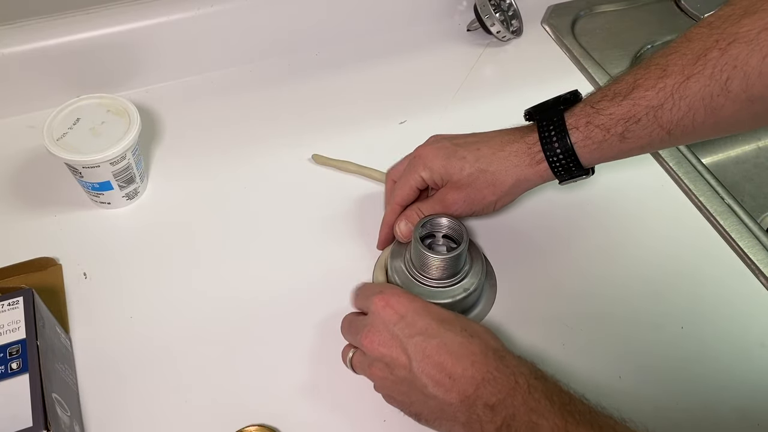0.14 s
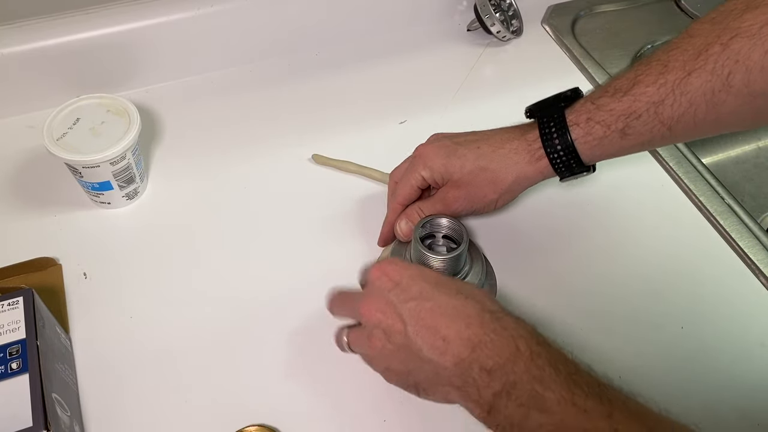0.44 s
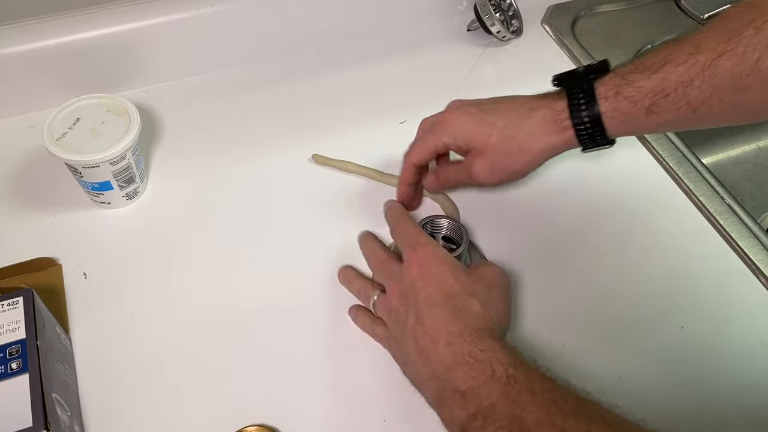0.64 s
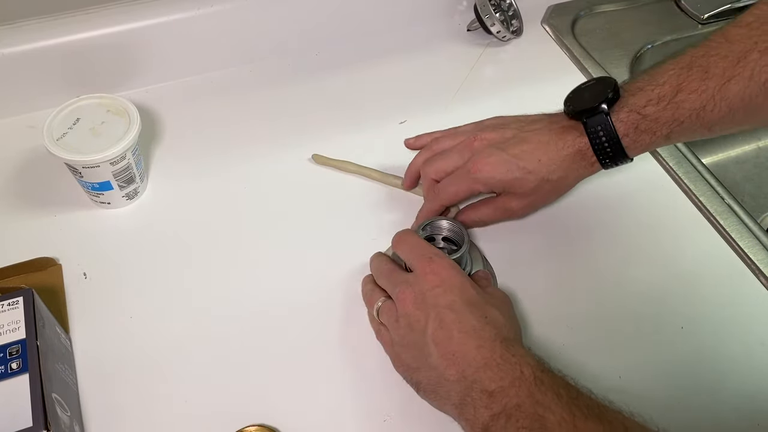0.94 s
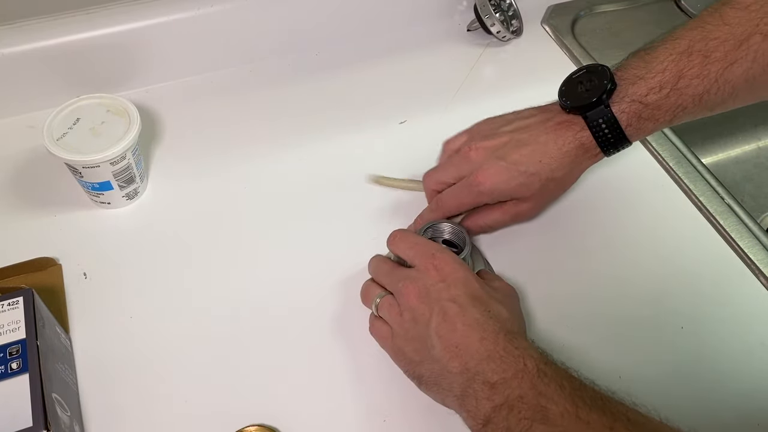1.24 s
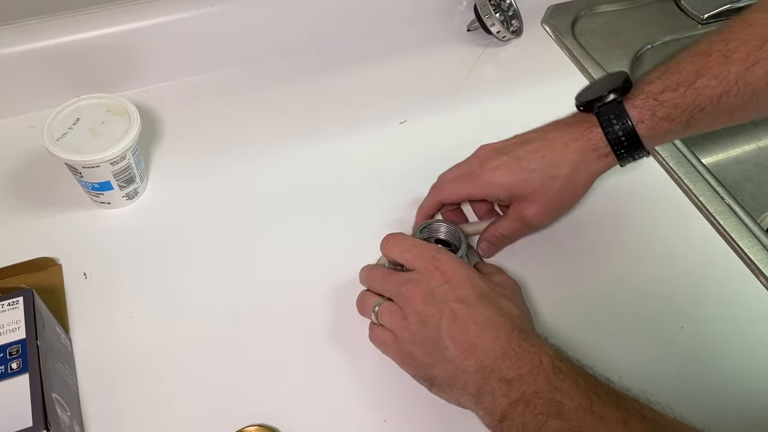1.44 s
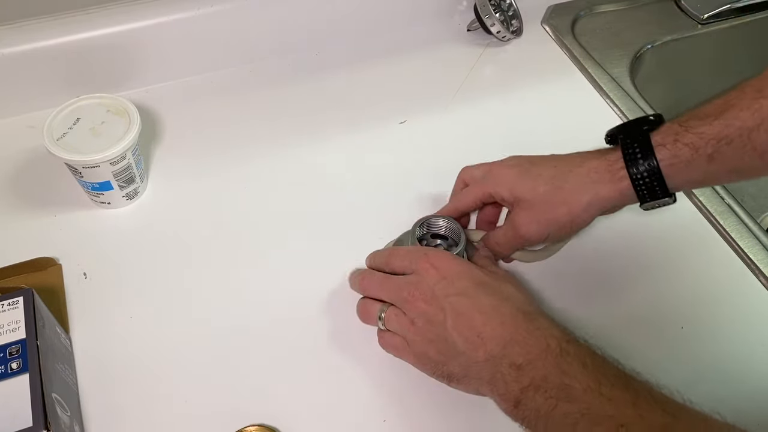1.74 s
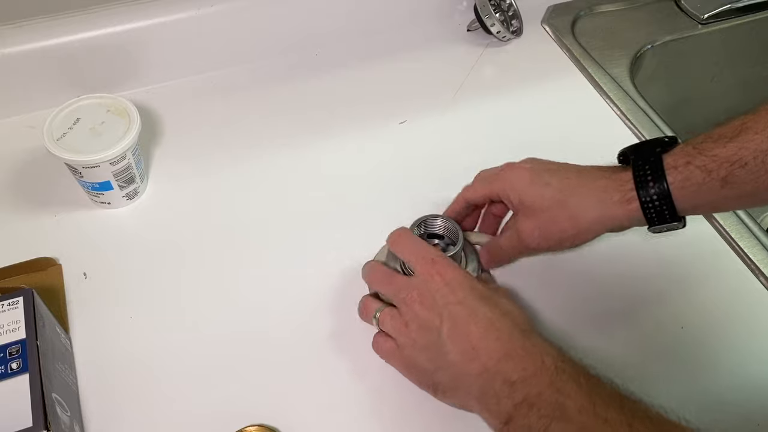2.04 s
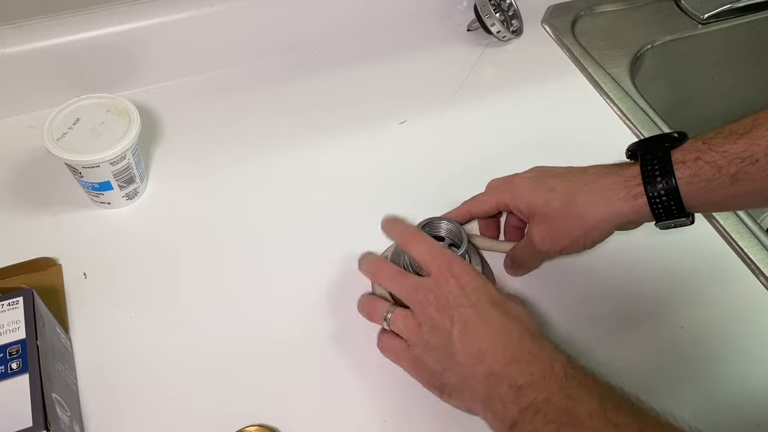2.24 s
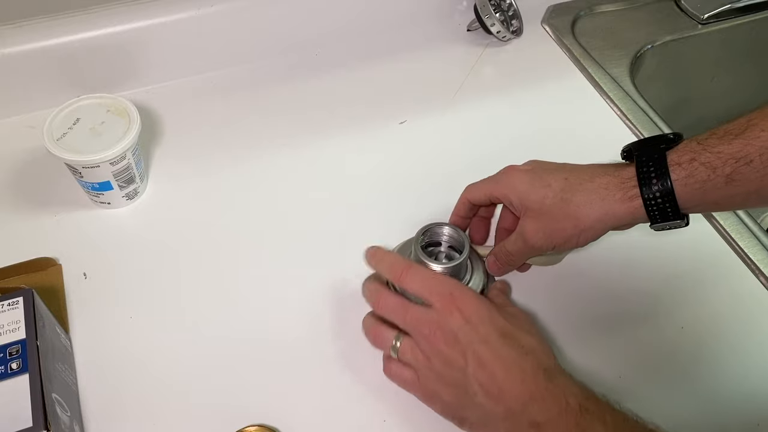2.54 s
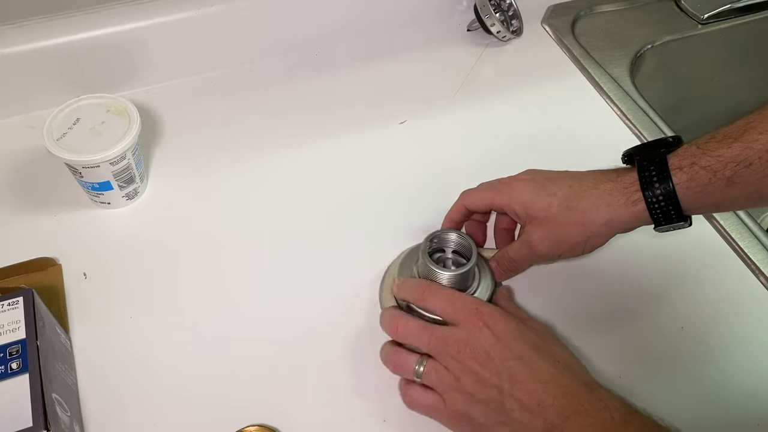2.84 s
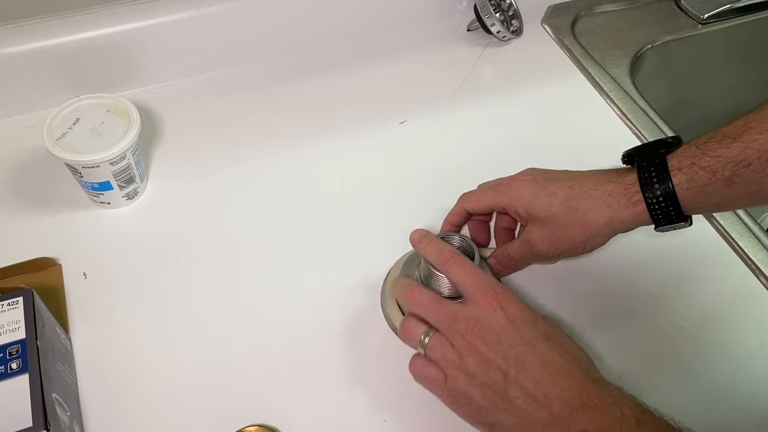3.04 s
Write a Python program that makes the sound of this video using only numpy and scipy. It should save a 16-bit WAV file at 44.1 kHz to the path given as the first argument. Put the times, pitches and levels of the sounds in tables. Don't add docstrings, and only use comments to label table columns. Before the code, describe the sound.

A small metal fitting is turned and shifted on a hollow countertop, clinking, scraping and knocking softly.

```python
import sys
import numpy as np
from scipy import signal
from scipy.fft import rfft, irfft
from scipy.io import wavfile
from scipy.ndimage import uniform_filter1d

SR = 44100
rng = np.random.default_rng(int(sys.argv[2]) if len(sys.argv) > 2 else 0)


def gain_from_decibels(decibels):
    exponent = np.asarray(decibels, float) / 20
    return 10 ** exponent


def generate_wav(sig):
    pcm = np.round(np.clip(np.atleast_2d(sig).T, -1, 1) * 32767).astype(np.int16)
    wavfile.write(sys.argv[1], SR, pcm)


N = 141120
T = np.arange(N) / SR

# [middle t/s, width/s, level/dB, dullness/dB]
FINGER_RUBS = [(0.058, 0.041, -60, 8.5), (.48, 0.017, -69, 24.5), (.53, 0.023, -64, 9),
               (0.836, 0.039, -57.5, 10), (.92, 0.02, -61.5, 14), (.98, 0.02, -58.5, 9),
               (1.09, 0.046, -65, 12), (1.27, 0.11, -63.5, 9.5), (1.43, 0.075, -61.5, 18),
               (1.49, 0.043, -51, 3), (1.548, 0.056, -53, 14), (1.69, 0.064, -59, 10.5),
               (1.84, 0.06, -70, 11), (2., 0.027, -61.5, 15.5), (2.088, 0.051, -51.5, -18),
               (2.193, 0.035, -49.5, -7), (2.32, 0.083, -68, 12), (2.421, 0.026, -54, 9),
               (2.479, 0.058, -52, 10), (2.609, 0.042, -55, 0), (2.68, 0.0071, -55, -4),
               (2.75, 0.044, -60.5, -8.5), (2.903, 0.079, -52, -8), (3.028, 0.021, -52, 9.5),
               (3.19, 0.036, -55, 7)]
# [f/Hz, level/dB]
SKIN_TONE = [
    (1500, -17),
    (2500, -8.5),
    (4300, -8),
    (8200, 0.5),
    (9500, -2.5),
    (10600, -6),
    (13000, -8.5),
    (15500, -14),
]
# [f/Hz, time to fall 60 dB/s, level/dB]
STEEL_MODES = [(2410, .15, -9), (3060, .15, -7), (3870, .1, -5), (4230, .15, -6), (4520, .2, -1.5),
               (5350, .06, -7), (6470, .05, -7), (7650, .07, -2), (8560, .04, -5), (9440, .06, -7),
               (11400, .07, -9)]
# [middle t/s, width/s, level/dB, grit/dB, weight on deep modes/dB]
BASE_DRAGS = [(0.048, 0.046, -54, 6, 0.5), (.34, 0.036, -51, 1, 2.5), (.48, 0.034, -49.5, 4, -1.5),
              (.55, 0.02, -44, -9, 2.5), (0.862, 0.033, -46.5, -17, 2), (0.948, 0.065, -52, 7, 0.5),
              (1.138, 0.031, -55, -3, 5), (1.28, 0.074, -56, -5, -3), (1.371, 0.064, -53.5, 9.5, 5),
              (1.49, 0.071, -46, -1.5, 1), (1.658, 0.072, -49.5, -0.5, -5),
              (1.998, 0.037, -44.5, -5.5, 0.5), (2.071, 0.027, -46, -4, -1.5), (2.17, 0.066, -50.5, 6, 0.5),
              (2.419, 0.059, -50, 6, -0.5), (2.511, 0.027, -46, -3, -1.5), (2.61, 0.038, -55.5, 8, 3),
              (2.69, 0.054, -47.5, -1, 1), (2.77, 0.014, -56, 5, 1), (2.872, 0.079, -51.5, 6, -2),
              (2.998, 0.034, -46.5, 5.5, -0.5), (3.132, 0.043, -47, 0, 2)]
# [f/Hz, width/Hz, level/dB]
COUNTER_MODES = [
    (185, 47, -2),
    (317.4, 34, -0.5),
    (349.8, 76, 2),
    (421.6, 38, 1.5),
    (521, 26, -1.5),
    (592.2, 34, 0),
    (679, 38, -13.5),
    (718, 32, -12),
]
# [t/s, peak level/dB, favoured f/Hz]
BASE_SLIPS = [(0.324, -40.5, 423), (0.449, -41, 324), (0.482, -38.5, 343), (0.513, -35, 344),
              (0.849, -33.5, 560), (0.903, -32.5, 581), (1.065, -43.5, 328), (1.097, -49, 377),
              (1.13, -42.5, 573), (1.215, -42, 293), (1.28, -51, 288), (1.301, -56, 420), (1.347, -36, 610),
              (1.381, -36, 394), (1.467, -30, 327.5), (1.486, -34, 319), (1.642, -34.5, 364),
              (1.746, -58, 590), (1.959, -45, 410), (1.993, -43, 338), (2.057, -36, 572), (2.127, -44, 585),
              (2.368, -41, 423), (2.504, -39, 599), (2.606, -36.5, 309), (2.653, -55, 465),
              (2.674, -45, 350), (2.733, -39, 590), (2.83, -39, 306), (2.864, -38, 319), (2.92, -41, 327),
              (2.974, -43, 370), (2.994, -37.5, 350), (3.115, -38.5, 586),
              (.01, -48, 266), (.05, -42, 611), (.52, -42, 200), (1.205, -44, 197),
                     (1.235, -41, 194), (1.29, -48, 842), (1.345, -40, 192), (1.39, -45.5, 847),
                     (1.465, -39.5, 732), (1.52, -42, 345), (1.94, -43, 195)]
# [t/s, level/dB, colour
# f/Hz]
STEEL_TICKS = [(.011, -33, 5500), (0.447, -37.5, 3000), (.5142, -49, 8000), (0.6286, -37.5, 4500),
               (1.2645, -35, 1800), (1.4117, -34.5, 7440), (1.5206, -23.5, 3230), (1.9907, -37, 5940),
               (2.1794, -39, 6450), (2.3995, -27, 2600), (2.67, -41, 5030), (2.7314, -36.5, 7800),
               (2.9492, -33, 6900), (3.005, -23, 7650), (0.908, -26, 1100)]
# [t/s, f/Hz, level/dB]
STEEL_RINGS = [(.011, 5430, -62), (.011, 6250, -63), (.022, 6500, -71), (.011, 7150, -65),
               (.011, 3450, -64), (0.009, 2540, -65.5), (.011, 3930, -66), (0.057, 8140, -62),
               (0.051, 1810, -63), (.075, 3370, -64.5), (.514, 4520, -64), (.514, 9500, -70),
               (.826, 5130, -62), (1.211, 4520, -70), (1.32, 1800, -64), (1.398, 1795, -54),
               (1.411, 4520, -57), (1.52, 3050, -51.5), (1.52, 3900, -57), (1.521, 5260, -57),
               (2.2, 4600, -63), (2.177, 5360, -57), (2.353, 4540, -64.5), (2.401, 3040, -59),
               (2.4, 1800, -58), (2.405, 7700, -53.5), (2.449, 7700, -57), (2.452, 2400, -57.5),
               (2.452, 2740, -58), (2.59, 4550, -64), (2.731, 3010, -63), (2.871, 3030, -70),
               (2.95, 3060, -53.5), (2.95, 11400, -66), (3.005, 3040, -56), (3.026, 4520, -52),
               (3.168, 4530, -60.5)]
# [t/s, peak level/dB]
NAIL_SNAPS = [
    (0.447, -49),
    (0.6284, -39.5),
    (2.4005, -46),
]
# [t/s, level/dB, brightest f/Hz]
RIM_KNOCKS = [
    (0.847, -53, 1010),
    (0.905, -39, 1290),
    (0.926, -43, 1020),
    (1.262, -44, 1980),
    (1.376, -45, 1740),
    (1.946, -54.5, 1210),
    (0.628, -51, 2860),
]
# [f/Hz, level/dB, time to fall 60 dB/s]
RIM_MODES = [
    (670, 4.5, 0.3),
    (874, -2, 0.18),
    (1075, -2, 0.22),
    (1384, -3.5, 0.34),
    (1470, -19, 0.069),
    (1752, 3.5, 0.13),
    (2250, -17, 0.068),
    (2800, -6, 0.12),
]
# [t/s, level/dB]
COUNTER_BUMPS = [
    (0.768, -21.5),
    (1.197, -26.5),
    (1.65, -23.5),
    (3.099, -32),
]
# [f/Hz, level/dB, waver/dB]
APPLIANCE_HUM = [
    (48.48, -47.5, 0),
    (119.35, -42.5, 1.34),
]
# [f/Hz, level/dB]
RUMBLE_TONE = [(14, -67), (25, 13.5), (37, -37), (55, 19.5), (75, 13.5), (100, 14.5), (135, 6.5),
               (160, -33.5)]
# [f/Hz, level/dB]
ROOM_TONE = [(130, -17), (240, -26), (840, -30.5), (1500, -40), (3500, -44.5), (8000, -52), (10500, -56),
             (15800, -77)]
# [middle t/s, width/s, level/dB]
AIR_SWAYS = [(.07, 0.14, -40), (.22, .05, -35), (.37, 0.07, -31), (.9, 0.27, -42), (1.35, .2, -42),
             (1.95, 0.16, -34.5), (2.2, 0.09, -33.5), (2.85, 0.5, -39.5)]


def evened(x):
    return x / np.sqrt(np.mean(x ** 2) + 1e-20)


def coloured(points, x=None):
    f, db = np.transpose(points)
    hz = np.fft.rfftfreq(N, 1 / SR)
    if x is None:
        x = rng.standard_normal(N)
    gain = gain_from_decibels(np.interp(np.log(hz + 1), np.log(f + 1), db, left=-90))
    return evened(irfft(rfft(x) * gain, N))


def resonate(x, hz, width):
    r = np.exp(-np.pi * width / SR)
    return signal.lfilter([1 - r, 0, r - 1], [1, -2 * r * np.cos(2 * np.pi * hz / SR), r * r], x)


def resonate_twice(x, hz, first_width, second_width):
    return resonate(resonate(x, hz, first_width), hz, second_width)


def strokes(rows):
    onset = 0.74
    power = 0
    for s, width, db in rows:
        side = np.where(T < s, onset * width, width / onset)
        power = power + gain_from_decibels(2 * db) * np.exp(-((T - s) / side) ** 2)
    return np.sqrt(power)


def waver(per_s):
    t = T[::64]
    waves = [np.sin(2 * np.pi * (f * t + rng.random())) / np.sqrt(f)
             for f in np.geomspace(per_s / 20, per_s, 20)]
    return np.interp(T, t, evened(sum(waves)))


def grainy(spread_db, per_s):
    size = np.minimum(rng.exponential(1, N), 5)
    return evened(rng.standard_normal(N) * gain_from_decibels(spread_db * size + 1.24 * waver(per_s)))


def blurred_noise(shape, bins, frames):
    x = uniform_filter1d(rng.standard_normal(shape), size=bins, axis=0)
    return evened(uniform_filter1d(x, size=frames, axis=1))


def streaked(x):
    z = signal.stft(x, nperseg=512, noverlap=384)[2]
    fine = blurred_noise(z.shape, 2, 12)
    wide = blurred_noise(z.shape, 25, 8)
    gain = gain_from_decibels(3.1 * fine + 1.5 * wide)
    return evened(signal.istft(z * gain, nperseg=512, noverlap=384)[1][:N])


def add(mix, s, sound):
    part = mix[round(s * SR):][:len(sound)]
    part += sound[:len(part)]


def rubs():
    skin_slips = grainy(3.2, 60)
    bright = strokes([row[:3] for row in FINGER_RUBS])
    dull = strokes([(s, w, db + d) for s, w, db, d in FINGER_RUBS])
    touch = bright ** .7 * skin_slips
    sing = 0
    for hz, t60, db in STEEL_MODES:
        width = 2.2 / t60
        sing = sing + gain_from_decibels(db + 3 * waver(20)) * resonate(touch, hz, width) / np.sqrt(width)
    sing = gain_from_decibels(-12) * np.sqrt(np.mean(bright ** 2)) * evened(sing)
    flat = evened(resonate_twice(grainy(0.27, 66), 3550, 4600, 6500))
    hiss = bright * streaked(coloured(SKIN_TONE, skin_slips))
    return hiss + gain_from_decibels(-15) * dull * streaked(flat) + sing


def drags():
    drag_db, grit_db = -6, -14.5
    modes = []
    for hz, width, db in COUNTER_MODES:
        ring = evened(resonate_twice(grainy(2.2, 40), hz, width, 3 * width))
        modes.append(gain_from_decibels(db + waver(12)) * ring)
    grit = evened(resonate_twice(grainy(2.2, 40), 1115, 1130, 2000))
    deep_level = strokes([(s, w, db + drag_db + deep) for s, w, db, g, deep in BASE_DRAGS])
    high_level = strokes([(s, w, db + drag_db - deep) for s, w, db, g, deep in BASE_DRAGS])
    grit_level = strokes([(s, w, db + g) for s, w, db, g, deep in BASE_DRAGS])
    panel = deep_level * evened(sum(modes[:4])) + high_level * evened(sum(modes[4:]))
    return panel + gain_from_decibels(grit_db) * grit_level * grit


def slips():
    t60, rise_s, reach_octaves = 0.22, 0.002, 0.23
    out, t = np.zeros(N), T[:SR // 4]
    for s, db, own_hz in BASE_SLIPS:
        ring, total = np.sin(2 * np.pi * own_hz * t), 1
        for hz, _, _ in COUNTER_MODES:
            near = gain_from_decibels(-6 * (np.log2(hz / own_hz) / reach_octaves) ** 2)
            ring = ring + near * np.sin(2 * np.pi * (hz * t + rng.random()))
            total += near
        shape = gain_from_decibels(db - 2 - 60 * t / t60) * (1 - np.exp(-t / rise_s))
        add(out, s, shape * ring / total)
    return out


def ticks():
    out, t = np.zeros(N), T[:SR // 4]
    fade = gain_from_decibels(-60 * t / 0.034) + gain_from_decibels(-14 - 60 * t / 0.11)
    for s, db, hz in STEEL_TICKS:
        scrape = fade * rng.standard_normal(len(t)) + 1.5 * (t == 0)
        hit = resonate_twice(scrape, hz, 0.48 * hz, 2 * hz)
        steel = sum(gain_from_decibels(d) * resonate(hit, f, 4 / t60) * np.sqrt(SR * t60 / 20)
                    for f, t60, d in STEEL_MODES)
        add(out, s, gain_from_decibels(db - 13) * (hit + gain_from_decibels(-16.5) * steel))
    return out


def rings():
    t60, grip_s, gripped_db = .45, .042, -8
    out, t = np.zeros(N), T[:SR // 4]
    grip = gripped_db / (1 + np.exp((grip_s - t) / .004))
    shape = np.minimum(t / .004, 1) * gain_from_decibels(grip - 60 * t / t60)
    for s, hz, db in STEEL_RINGS:
        blur = .3 * evened(resonate(rng.standard_normal(len(t)), hz, 120))
        add(out, s, gain_from_decibels(db + 2) * shape * (np.sin(2 * np.pi * hz * t) + blur))
    return out


def snaps():
    hz = 4350
    out, t = np.zeros(N), T[:400]
    for s, db in NAIL_SNAPS:
        rattle = .3 * gain_from_decibels(-60 * t / .012) * rng.standard_normal(len(t))
        click = resonate((t == 0) + rattle, hz, 1.5 * hz)
        add(out, s, gain_from_decibels(db) * click / abs(click).max())
    return out


def knocks():
    rise_s, reach_octaves = 0.0072, 0.59
    out, t = np.zeros(N), T[:SR // 3]
    for s, db, top_hz in RIM_KNOCKS:
        modes = 0
        for hz, d, t60 in RIM_MODES:
            far_db = 3.9 * (np.log2(hz / top_hz) / reach_octaves) ** 2
            modes = modes + gain_from_decibels(d - 60 * t / t60 - far_db) * np.sin(2 * np.pi * (hz * t + rng.random()))
        scuff = resonate(rng.standard_normal(len(t)), 0.82 * top_hz, 840)
        scuff = evened(resonate(scuff, 0.93 * top_hz, 3200))
        scuff = gain_from_decibels(5.5 - 60 * t / 0.084) * scuff
        add(out, s, gain_from_decibels(db - 6.5) * np.minimum(t / rise_s, 1) * (modes + scuff))
    return out


def bumps():
    hz, t60, rise_s = 53.3, 0.2, 0.023
    out, t = np.zeros(N), T[:SR // 3]
    for s, db in COUNTER_BUMPS:
        shape = gain_from_decibels(db - 60 * t / t60) * (1 - np.exp(-t / rise_s))
        add(out, s, shape * np.sin(2 * np.pi * hz * t))
    return out


def hum():
    return sum(gain_from_decibels(db + 2.5 + w * waver(3.8)) * np.sin(2 * np.pi * (hz * T + rng.random()))
               for hz, db, w in APPLIANCE_HUM)


def air_sway():
    hz = 5.35
    return strokes(AIR_SWAYS) * evened(resonate_twice(rng.standard_normal(N), hz, 7.4, 20))


def room():
    rumble = gain_from_decibels(-50) * coloured(RUMBLE_TONE)
    return rumble + gain_from_decibels(-57 + .5 * waver(4.54)) * coloured(ROOM_TONE)


def scene():
    steel = rubs() + ticks() + rings() + snaps()
    counter = drags() + slips() + knocks() + bumps()
    background = hum() + air_sway() + room()
    return (steel + counter + background)[None]


def roll_off(x):
    return signal.sosfilt(signal.butter(12, 15830, fs=SR, output="sos"), x)


def record(dry):
    edge = signal.firwin(401, 15790, window=("kaiser", 8), fs=SR)
    mix = signal.oaconvolve(dry, edge[None], "same")
    return roll_off(mix)


dry = scene()
out = record(dry)
generate_wav(out)
```